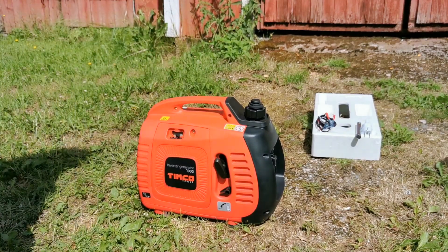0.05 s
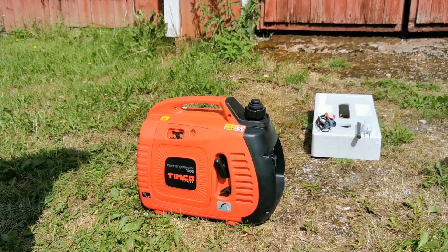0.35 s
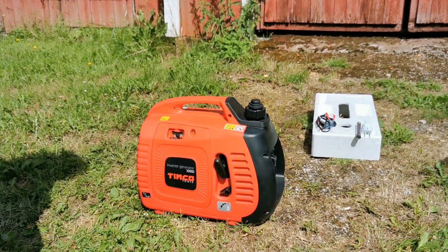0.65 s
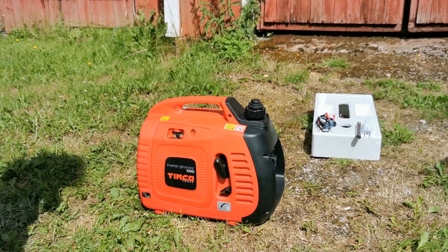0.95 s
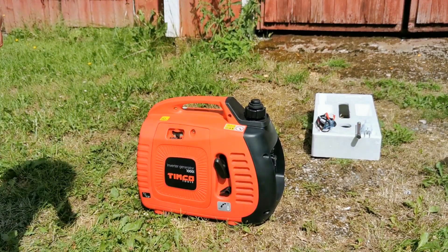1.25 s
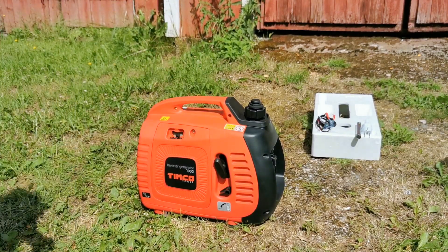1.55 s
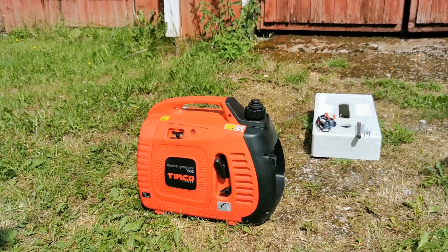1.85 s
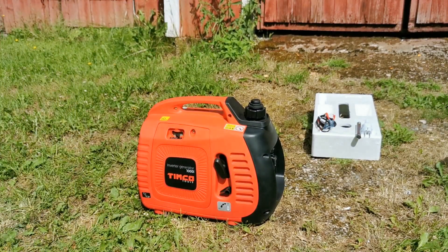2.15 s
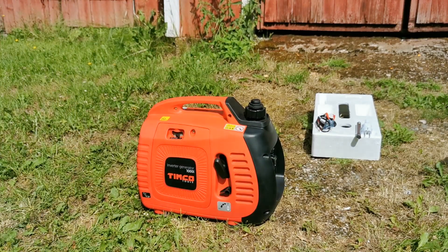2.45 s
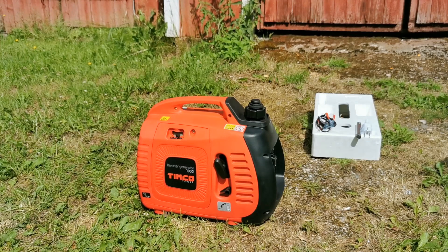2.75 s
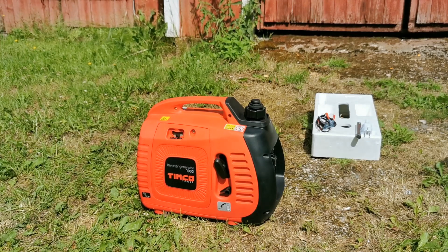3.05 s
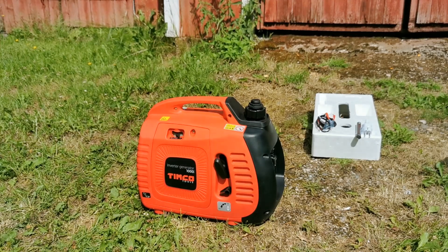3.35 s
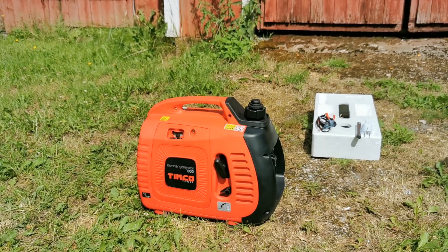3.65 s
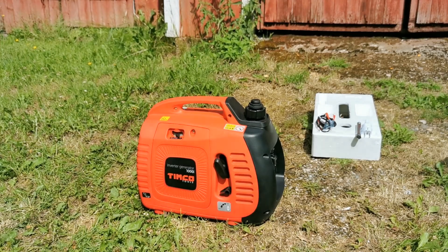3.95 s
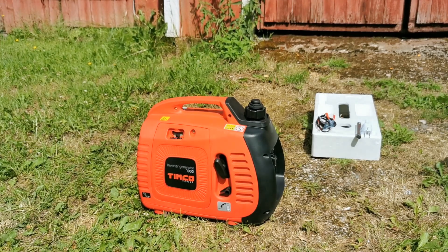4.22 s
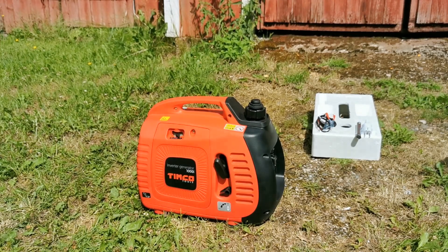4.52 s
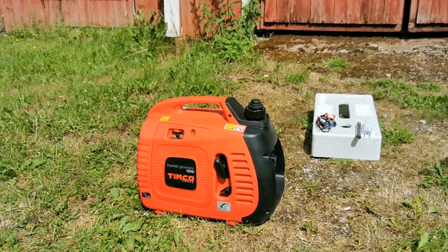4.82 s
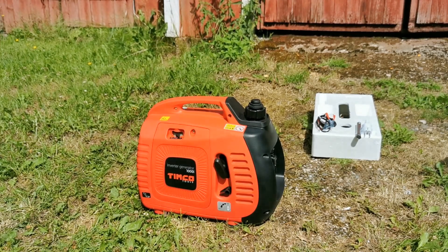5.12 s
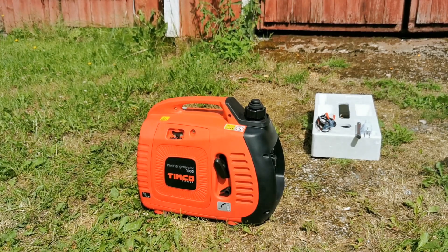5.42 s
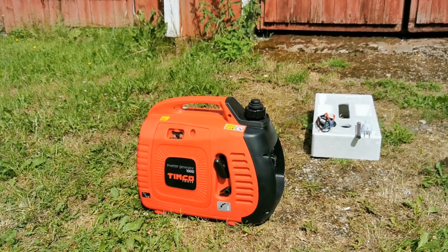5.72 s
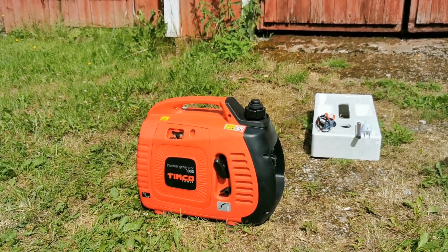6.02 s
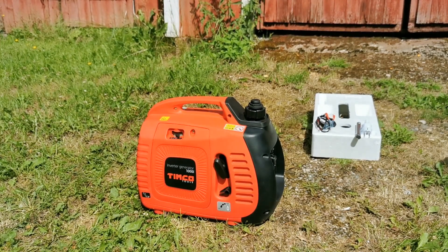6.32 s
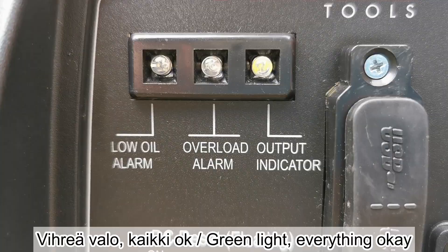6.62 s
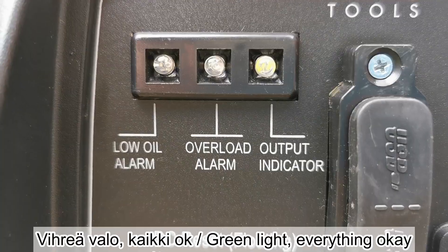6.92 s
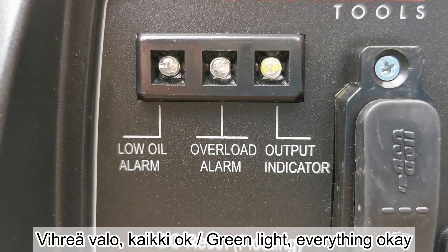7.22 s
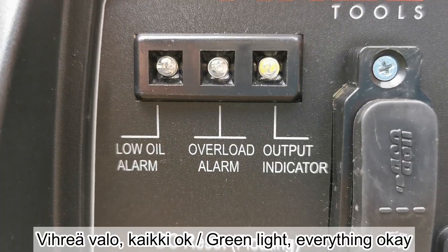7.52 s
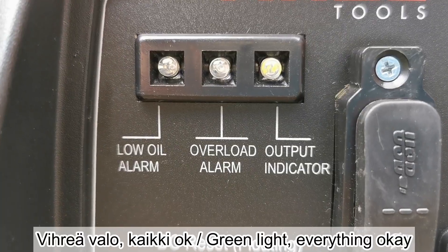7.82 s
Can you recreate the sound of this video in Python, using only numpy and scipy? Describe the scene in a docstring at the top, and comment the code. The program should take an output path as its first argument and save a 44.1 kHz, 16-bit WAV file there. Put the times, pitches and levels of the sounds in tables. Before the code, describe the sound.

From a few steps away, a small generator engine ticks over steadily in the open air, its muffler thumping and plastic shell knocking under metallic ticking and a soft rush of fan air. After about six and a half seconds it breaks off for a moment. Then the microphone is right at its control panel, where the engine runs faster, with sharp firing pulses over a hum and the treble on the right.

```python
"""A small four-stroke generator ticks over on grass, then, after a short silence, runs faster and closer.
From a few steps away: a muffler thump, intake gulp and exhaust hiss each cycle, a shell knock each turn,
piston slap, valve clatter, fan air and thin whines. Close at its control panel: sharp firing pulses over
the hum of the shell, nearly all the treble on the right. Impulses locked to the crank ring the muffler,
shell and casing; air and hiss are shaped noise. One cycle is two crank turns."""
import sys
import numpy as np
from scipy import signal
from scipy.fft import rfft, irfft, next_fast_len
from scipy.io import wavfile
from scipy.ndimage import uniform_filter1d, map_coordinates

SR = 44100
rng = np.random.default_rng(int(sys.argv[2]) if len(sys.argv) > 2 else 0)


def materialize(psi):
    """Save the field psi as 16-bit PCM at rate SR to the path in sys.argv[1].

    A 1-D psi becomes a single channel; in a 2-D psi each row is a channel.
    """
    bounded = np.clip(np.atleast_2d(psi).T, -1, 1)
    quanta = np.round(bounded * 32767).astype(np.int16)
    wavfile.write(sys.argv[1], SR, quanta)


N = 351477
TIME = np.arange(N) / SR


def idling():
    """Slow run, a few steps away: each firing rings the muffler, each turn knocks the plastic shell."""
    # crank speed, governor hunting (time [s], speed [turns/s])
    crank_speed = [(0.0, 32.21), (0.3, 31.46), (0.7, 32.45), (1.5, 32.14), (2.55, 32.34), (2.75, 32.73),
                   (3.65, 33.09), (3.85, 32.4), (4.05, 33.4), (5.25, 32.81), (5.45, 32.23), (5.85, 32.99),
                   (6.15, 32.34), (6.6, 33.23)]
    # resonances (frequency [Hz], width [Hz], level [dB])
    muffler_modes = [(56, 84, -48), (112.6, 100, -31.5), (151.4, 126.5, -34), (339.4, 25, -55)]
    shell_modes = [(71.6, 58.5, -41), (165.6, 125.7, -33), (196.4, 33.2, -32), (298.3, 32.2, -33.5),
                   (279.7, 129.4, -34), (341.4, 16.1, -36.5), (532.4, 40, -49.5), (477, 280, -54.5),
                   (626.5, 28, -59), (748, 17, -57.5)]
    metal_modes = [(1227, 39, 7.5), (1474, 31, 5.5), (1578, 18, 8), (2395, 65, 4.5), (3690, 16, 11),
                   (4780, 32, 3.5), (6600, 110, -2), (6930, 90, -0.5), (7480, 73, 3.5), (9380, 66, 8),
                   (10460, 100, 3.5)]
    # valve and piston contacts (place [cycles], level [dB])
    contacts = [(.0, 0.5), (.125, 0), (0.245, 2.5), (.305, 3.5), (.41, 5), (.49, 4), (.57, 1.5), (.63, 4),
                (.9, 0)]
    # spectra (frequency [Hz], level [dB])
    clatter_spectrum = [(400, -40.5), (470, -10.5), (650, -11.5), (950, -11.5), (1500, -15), (1950, -23),
                        (2400, -21), (3050, -18.5), (3800, -27), (5000, -21.5), (6000, -27), (7800, -27.5),
                        (9500, -24.5), (10700, -27.5), (11600, -32.5)]
    air_spectrum = [(20, -66), (50, -71.5), (150, -60.5), (300, -64), (600, -69), (1000, -80), (2600, -81),
                    (3700, -89.5), (5000, -88), (7200, -96.5), (9000, -94.5), (10500, -91), (11400, -101),
                    (16000, -106)]
    # stereo balance (frequency [Hz], left minus right [dB])
    balance = [(60, 2.5), (130, 1.5), (200, 1.3), (300, 0), (550, -5), (1290, -2), (2380, -4), (4400, 0.5),
               (8120, -2), (15000, -1.5)]
    speed, cycle = crank(crank_speed)
    firing = strokes(cycle - .196, scatter_db=.7, jitter_s=.0001)
    turning = strokes(2 * (cycle - .321), scatter_db=.4, jitter_s=.00005)
    knocks = soften(resonate(firing, muffler_modes) + resonate(turning, shell_modes), corner_hz=1020)
    drone = knocks + intake_gulp(cycle) + amp(-47.5) * piston_slap(cycle)
    body = -amp(-.12) * drift(depth_db=.35, rate_hz=3) * shell_panels(drone, speed)
    valves = amp(-46) * valve_clatter(cycle, contacts, clatter_spectrum,
                                      t60_s=.031, jitter_s=.00007, scatter_db=2.5, loose_share=.24)
    exhaust = amp(-53) * exhaust_hiss(cycle)
    fan = amp(-1) * fan_air(cycle, air_spectrum, peak_cycles=.13, throb_db=1.7, flutter_db=.37)
    # timing gear: sings when its tooth rate meets a metal resonance
    gear = amp(-65.5) * whine(96 * cycle, waver_rad=.5, rate_hz=30)
    inverter = amp(-64.5) * whine(8305 * TIME, waver_rad=1.8, rate_hz=64)
    speed_gain = amp(.9 * (speed - speed.mean()))  # 0.9 dB per turn/s
    rattle = metal_parts(speed_gain * (valves + fan) + exhaust + gear, metal_modes, ripple_db=1.5)
    return view(body + rattle + inverter, balance, start_s=-.1, end_s=6.628)


def running_fast():
    """Fast run, at the control panel: firings ring the muffler over the hum of the shaking shell."""
    # crank speed (time [s], speed [turns/s])
    crank_speed = [(6.85, 72.96), (7.05, 72.91), (7.25, 73.64), (7.45, 73.67), (7.65, 73.12), (7.85, 73.25),
                   (8.05, 73.28)]
    # resonances (frequency [Hz], width [Hz], level [dB])
    muffler_modes = [(60.6, 110, -43.5), (134, 29, -34.5), (225, 41, -41.5), (326, 37.7, -32),
                     (320.8, 59.4, -33.5), (611, 16, -41), (565, 64, -45), (624, 290, -47.5),
                     (987, 16, -50.5), (416, 12, -44.5), (800, 43, -57), (654, 8.8, -52.5)]
    shell_modes = [(65.3, 19, -32)]
    metal_modes = [(1273, 40, 4.5), (1930, 190, 3.5), (2650, 62, 2.7), (3320, 46, 2.7), (4120, 120, 2),
                   (4360, 47, 7), (4900, 50, 4.7), (7430, 60, 6), (8250, 40, 4)]
    # valve and piston contacts (place [cycles], level [dB])
    contacts = [(.04, -2), (.15, -2), (0.401, -3), (.52, -4.5), (.62, -5.5), (.79, -5.5), (.89, 0)]
    # spectra (frequency [Hz], level [dB])
    clatter_spectrum = [(600, -30), (850, -5), (1100, -13.5), (1500, -7), (1900, -9.5), (2400, -11.5),
                        (3100, -31.5), (4400, -24.5), (5800, -28), (7300, -25.5), (9000, -34.5),
                        (12000, -26), (15000, -40)]
    air_spectrum = [(25, -78), (150, -63.5), (300, -71), (600, -66.5), (1000, -78), (2300, -83),
                    (3300, -93.5), (4500, -92), (6300, -97), (7400, -98), (9500, -99), (10700, -90),
                    (13000, -89.5), (14200, -101), (16000, -102)]
    # stereo balance (frequency [Hz], left minus right [dB])
    balance = [(37, 4), (73, 1), (147, -2), (220, -8), (300, -13), (600, -20), (1300, -22), (2400, -28),
               (15000, -35)]
    _, cycle = crank(crank_speed)
    firing = strokes(cycle - .501, scatter_db=.6, jitter_s=.00005)
    turning = strokes(2 * (cycle - .262), scatter_db=.4, jitter_s=.00005)
    body = soften(resonate(firing, muffler_modes) - resonate(turning, shell_modes), corner_hz=1380)
    valves = amp(-46.5) * valve_clatter(cycle, contacts, clatter_spectrum,
                                        t60_s=.015, jitter_s=.00004, scatter_db=.4, loose_share=.11)
    fan = fan_air(cycle, air_spectrum, peak_cycles=1, throb_db=1, flutter_db=.9)
    rattle = metal_parts(drift(depth_db=.5, rate_hz=1.8) * valves + fan, metal_modes, ripple_db=2)
    return view(body + rattle, balance, start_s=6.882, end_s=8.1, lag_rad=.83)


def shell_panels(drone, speed):
    """Each panel lifts a narrow band of the drone near one engine speed, less as the engine warms."""
    # (frequency [Hz], half-width [Hz], peak speed [turns/s], near lift [dB], far lift [dB], fade [dB/s])
    panels = [(261.4, 18, 32.0, 3.5, -1.5, 0.04), (293, 28, 33.25, 7.5, 0.5, 0.6),
              (346, 22, 32.7, 3.5, 1, 0.94), (563, 43, 33.0, 3, -5.5, 1.04)]
    reach_turns_per_s, follow_s = .45, .78
    settled = uniform_filter1d(speed, size=int(follow_s * SR))
    out = drone
    for centre, width, peak_speed, near_db, far_db, fade_db_per_s in panels:
        nearness = np.exp(-((settled - peak_speed) / reach_turns_per_s) ** 4)
        lift_db = far_db + (near_db - far_db) * nearness - fade_db_per_s * TIME
        band = filtered(drone, lambda hz: np.exp(-((hz - centre) / width) ** 4))
        out = out + (amp(lift_db) - 1) * band
    return out


def intake_gulp(cycle):
    """Each intake stroke rings the air box."""
    # (frequency [Hz], width [Hz], level [dB])
    air_box_modes = [(120, 96, -47.5)]
    intake = strokes(cycle - .75, scatter_db=.7, jitter_s=.0001)
    return soften(resonate(intake, air_box_modes), corner_hz=222)


def piston_slap(cycle):
    """The piston hits the bore twice a turn and rings the crankcase: a short, pitched rasp."""
    # (place [turns], level [dB])
    slaps = [(0.148, -2), (.83, 3.5)]
    # (frequency [Hz], width [Hz], level [dB])
    crankcase_modes = [(565, 58, 2), (697, 183, -5.5)]
    hits = sum(amp(db) * strokes(2 * cycle - place, scatter_db=1.7, jitter_s=.00005)
               for place, db in slaps)
    return unit(soften(resonate(hits, crankcase_modes), corner_hz=950))


def valve_clatter(cycle, contacts, spectrum, t60_s, jitter_s, scatter_db, loose_share):
    """Each contact rings the casing its own way every cycle; a loose share rattles anew each time."""
    t = np.arange(SR // 16) / SR
    decay = amp(-60 * t / t60_s)
    firm, power = np.zeros((2, N)), np.zeros(N)
    for place, db in contacts:
        hits = amp(db) * strokes(cycle - place, scatter_db, jitter_s)
        ring = decay * rng.standard_normal((2, len(t)))
        firm += signal.oaconvolve(hits[None], ring, axes=1)[:, :N]
        power += hits ** 2
    envelope = np.sqrt(np.abs(signal.oaconvolve(power, decay ** 2)[:N]))
    loose = envelope * rng.standard_normal((2, N))
    blend = np.sqrt(1 - loose_share) * unit(firm) + np.sqrt(loose_share) * unit(loose)
    return unit(spread(blend, spectrum))


def fan_air(cycle, spectrum, peak_cycles, throb_db, flutter_db):
    """Cooling air and intake rush, strongest at one place in the cycle."""
    flow = amp(throb_db * np.cos(2 * np.pi * (cycle - peak_cycles)) + flutter_db * wobble(12))
    return flow * spread(np.sqrt(SR / 2) * rng.standard_normal((2, N)), spectrum)


def exhaust_hiss(cycle):
    """A bright spit as the exhaust valve opens, trailing off; its colour varies by cycle."""
    # (frequency [Hz], level [dB])
    gas_spectrum = [(5200, -36.5), (6200, -9), (6700, 3), (7400, -7), (8200, -6), (9000, -3), (9700, -1.5),
                    (10400, 0.5), (11300, -11), (13000, -4.5), (14200, -17), (16000, -14)]
    open_cycles, rise_cycles, fall_cycles, tail_cycles = .214, .037, .069, .94
    tail_db, scatter_db = -24, 2.5
    number, age = np.divmod(cycle - open_cycles + 1, 1)
    gas = unit(spread(rng.standard_normal((2, N)), gas_spectrum))
    attack = 1 - np.exp(-(age / rise_cycles) ** 2)
    tail = amp(tail_db) * np.exp(-age / tail_cycles)
    common = rng.standard_normal(int(number[-1]) + 1)
    out = 0
    for low_hz, high_hz in [(0, 8000), (8000, 11300), (11300, SR)]:
        strength = amp(scatter_db * (common + rng.standard_normal(len(common))) / np.sqrt(2))
        spit = strength[number.astype(int)] * np.exp(-age / fall_cycles)
        band = filtered(gas, lambda hz: (hz >= low_hz) & (hz < high_hz))
        out = out + unit(attack * (spit + tail)) * band
    return out


def metal_parts(x, modes, ripple_db):
    """A few strong metal resonances over a crowd of weak ones, about 100 Hz apart."""
    crowd = rng.standard_normal(SR // 200 + 4)
    def colour(hz):
        lift = sum((amp(db) - 1) * resonance(hz, centre, width) for centre, width, db in modes)
        ripple = amp(ripple_db * np.clip(hz / 3000, 0, 1) * map_coordinates(crowd, [hz / 100]))
        return (1 + lift) * ripple
    return filtered(x, colour)


def whine(phase, waver_rad, rate_hz):
    """Thin tone, rms 1, with a wandering phase [periods]."""
    return np.sqrt(2) * np.sin(2 * np.pi * phase + waver_rad * wobble(rate_hz))


def crank(points):
    """Speed [turns/s] and running count of four-stroke cycles, per sample."""
    speed = np.interp(TIME, *np.transpose(points))
    return speed, np.cumsum(speed) / SR / 2


def strokes(phase, scatter_db, jitter_s):
    """An impulse at each whole number of phase, uneven in size and time; mean about 1."""
    whole = np.arange(np.ceil(phase[0]), phase[-1])
    timing, size = rng.standard_normal((len(whole), 2)).T
    onset_s = np.interp(whole, phase, TIME) + jitter_s * timing
    at = np.clip(onset_s * SR, 0, N - 1).astype(int)
    return np.bincount(at, amp(scatter_db * size) / np.gradient(phase)[at], N)


def resonance(hz, centre, width):
    """Complex response of one damped mode."""
    return 1j * hz * width / (centre ** 2 - hz ** 2 + 1j * hz * width)


def resonate(x, modes):
    """Parallel modes, alternating in sign."""
    return filtered(x, lambda hz: sum((-1) ** k * amp(db) * resonance(hz, centre, width)
                                      for k, (centre, width, db) in enumerate(modes)))


def soften(x, corner_hz):
    """Low-pass: pressure pulses last too long to hold treble."""
    return filtered(x, lambda hz: 1 / (1 + (hz / corner_hz) ** 4))


def spread(pair, spectrum):
    """Two unrelated signals to left and right, alike in the bass, coloured by the spectrum."""
    # (frequency [Hz], left-right likeness [0-1])
    likeness = [(100, 0.52), (300, 0.94), (640, 0.64), (1400, 0.6), (3100, 0), (7000, 0)]
    # ground and wall reflections: phase winds with frequency
    winding_rad = np.cumsum(rng.normal(1.5, 1, SR // 200 + 4))
    reflected = filtered(pair[0], lambda hz: np.exp(-1j * map_coordinates(winding_rad, [hz / 100])))
    diffuse = (pair[1] + reflected) / np.sqrt(2)
    colour = lambda hz: amp(along(spectrum, hz))
    width = lambda hz: np.tan(np.arccos(along(likeness, hz)) / 2)
    mid = filtered(pair[0], colour)
    side = filtered(diffuse, lambda hz: colour(hz) * width(hz))
    return np.array([mid + side, mid - side])


def view(x, balance, start_s, end_s, lag_rad=0):
    """One listening position: left-right tilt and phase lag, gated in time."""
    def tilt(hz):
        ratio = amp(along(balance, hz)) * np.exp(-1j * lag_rad)
        return 2 * np.array([ratio, np.ones_like(hz)]) / (1 + ratio)
    gate = ((TIME > start_s) & (TIME < end_s)).astype(float)
    return filtered(x, tilt) * uniform_filter1d(gate, size=64)


def drift(depth_db, rate_hz):
    """Gain wandering slowly about 1."""
    return amp(depth_db * wobble(rate_hz))


def wobble(rate_hz):
    """Smooth random curve, knots at rate_hz."""
    return map_coordinates(rng.standard_normal(int(N * rate_hz / SR) + 4), [TIME * rate_hz])


def filtered(x, response):
    """x through a complex frequency response."""
    size = next_fast_len(N + SR // 2)
    return irfft(rfft(x, size) * response(np.fft.rfftfreq(size, 1 / SR)), size)[..., :N]


def along(points, hz):
    """(frequency [Hz], value) points read on a log axis."""
    knots_hz, values = np.transpose(points)
    return np.interp(np.log(hz + 1), np.log(knots_hz + 1), values)


def amp(db):
    """Decibels to gain."""
    return 10 ** (np.asarray(db) / 20)


def unit(x):
    """x at rms 1."""
    return x / np.sqrt(np.mean(x ** 2) + 1e-20)


def scene():
    """The two views, one after the other."""
    return idling() + running_fast()


def record(dry):
    """Hard band limit."""
    top_hz = 15800
    return filtered(dry, lambda hz: hz < top_hz)


dry = scene()
out = record(dry)
materialize(out)
```